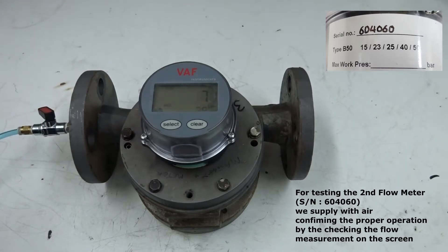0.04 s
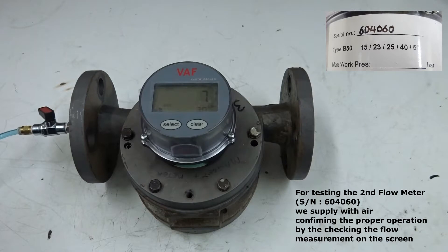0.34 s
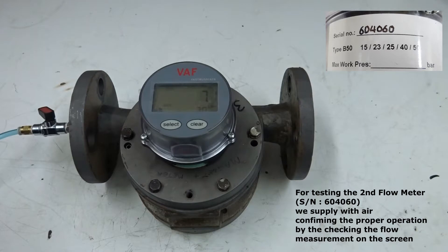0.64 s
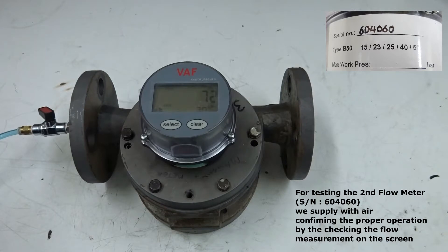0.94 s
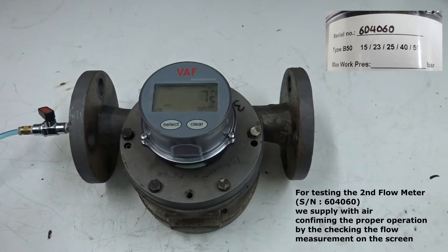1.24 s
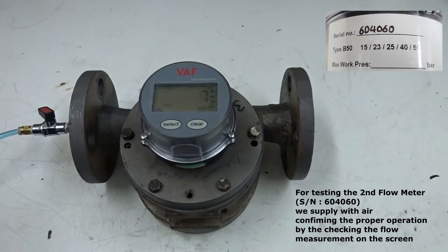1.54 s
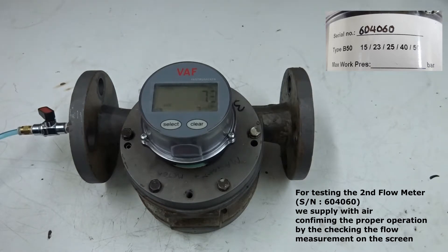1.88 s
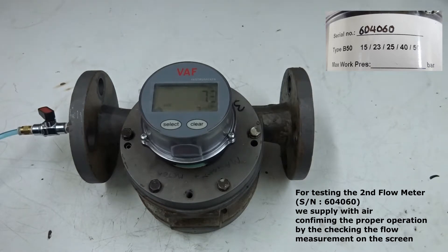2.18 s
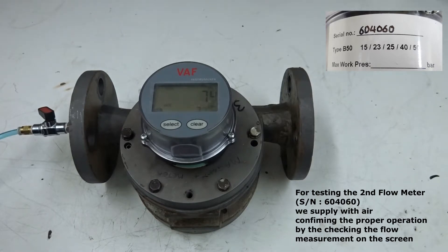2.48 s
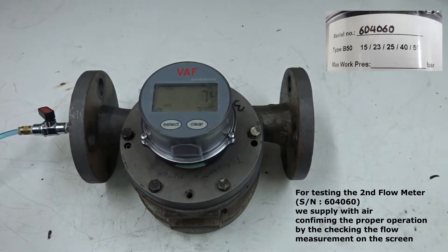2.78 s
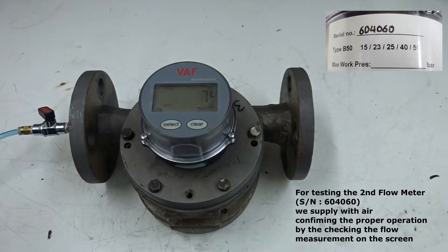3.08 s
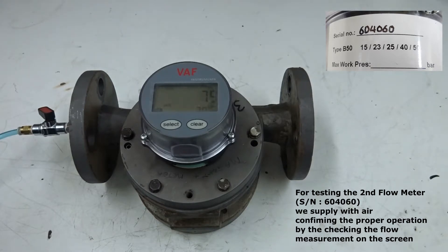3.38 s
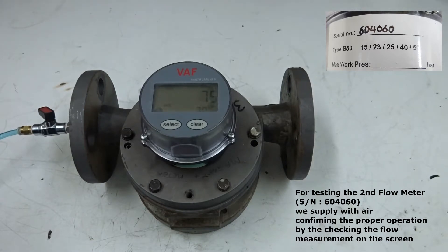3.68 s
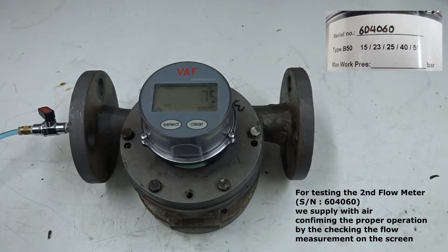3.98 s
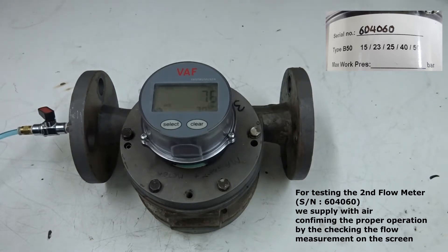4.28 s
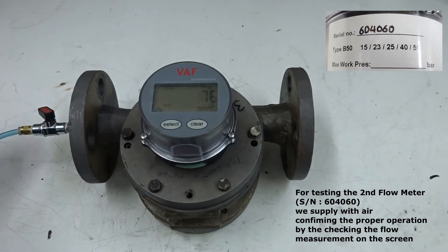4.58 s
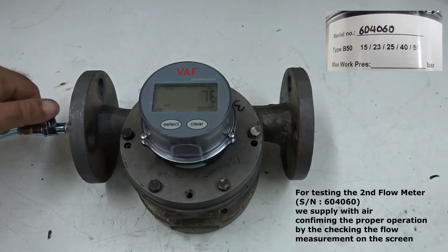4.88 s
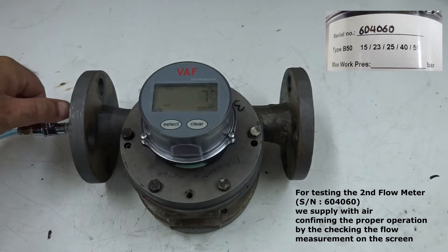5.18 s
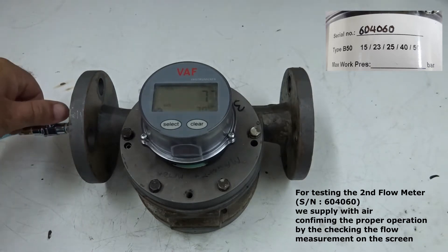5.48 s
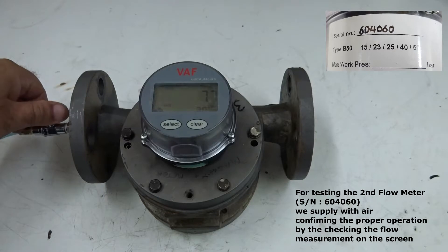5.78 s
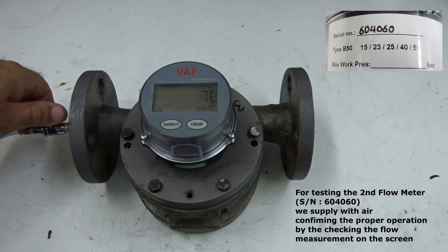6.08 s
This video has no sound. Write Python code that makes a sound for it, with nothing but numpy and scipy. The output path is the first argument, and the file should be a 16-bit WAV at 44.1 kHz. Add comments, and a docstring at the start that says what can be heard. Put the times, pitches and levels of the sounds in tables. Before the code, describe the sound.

Close by on a workshop bench, an air-driven meter whirs loudly and evenly, its fast throbbing hum mixed with fluttering hiss, light ticking and tiny repeating chirps. Near the end the air is shut off: a short, slightly whistling rush passes through the valve, and the hum and hiss die within half a second. A small click from the valve handle follows, over faint ventilation and distant machines.

```python
"""A pulsing hum and hiss with ticks and chirps, then a brief gush of air and a quiet workshop.
Compressed air spins the rotor of a cast-iron flowmeter, four strokes to a turn. Each stroke knocks
the air in the housing into a hum; the hiss swells until the port opens, and the gearing ticks.
A hand closes the ball valve: air tears through the gap, the rotor runs down and the handle clicks."""
import sys
import numpy as np
from scipy import signal
from scipy.fft import rfft, irfft
from scipy.io import wavfile
from scipy.ndimage import uniform_filter1d

SR = 44100
rng = np.random.default_rng(int(sys.argv[2]) if len(sys.argv) > 2 else 0)


def store_pcm(level_fs):
    """Save levels as 16-bit WAV."""
    pcm = np.round(np.clip(level_fs, -1, 1) * 32767).astype(np.int16)
    wavfile.write(sys.argv[1], SR, np.atleast_2d(pcm).T)


N = 279594
TIME = np.arange(N) / SR
HZ = np.fft.rfftfreq(N, 1 / SR)
GRIP_S, CLOSING_S, SHUT_S = 4, 5.56, 5.905  # lever gripped, throttling starts, valve seals

# strokes of one turn: knock/dB, upper-mode boost/dB, thump/dB, hiss/dB
TURN_STROKES = [(-0.77, -0.5, -31, 5), (-1.36, 2.5, -46, 4), (0.5, -2, -28.5, 4), (-0.18, 0, -51, 4)]


def amp(db):
    """Decibels to gain."""
    return 10 ** (np.asarray(db) / 20)


def unit(x):
    """Scale to rms 1."""
    return x / np.sqrt(np.mean(x ** 2) + 1e-20)


def ramp(start_s, end_s):
    """Linear rise from 0 to 1."""
    return np.clip((TIME - start_s) / (end_s - start_s), 0, 1)


def log_interp(points, hz):
    """Interpolate a spectrum table over log frequency."""
    f, value = np.transpose(points)
    return np.interp(np.log(hz + 1), np.log(f + 1), value)


def resonance(hz, width_hz):
    """Gain curve of one resonance, peak 1."""
    return 1 / (1 + (2 * (HZ - hz) / width_hz) ** 2)


def noise(gain):
    """Noise of rms 1, shaped by a gain per frequency."""
    return unit(irfft(rfft(rng.standard_normal(N)) * gain, N))


def band(hz, width_hz):
    """Noise in one resonance."""
    return noise(resonance(hz, width_hz))


def level_band(hz, width_hz):
    """A resonance with wandering pitch and even level."""
    phase = np.angle(signal.hilbert(band(hz, width_hz)))
    return unit(np.cos(phase))


def crossings(count):
    """Samples where a rising count crosses a whole number."""
    return np.flatnonzero(np.diff(np.floor(count)) > 0)


def strike(at, sizes, ring):
    """Set off a ring at each given sample."""
    blows = np.zeros(N)
    blows[at] = sizes
    return signal.oaconvolve(blows, ring)[:N]


def click(decay_s):
    """Envelope of a short contact, peak 1."""
    age = np.arange(SR // 20) / SR / decay_s
    return age * np.exp(1 - age)


def ambience(bed_db=-49):
    """Ventilation and distant machines."""
    ventilation = [(15, -10), (28, -16), (107, 1), (140, -3.5), (193, -2), (274, -5.5), (848, -13),
                   (970, -26), (1050, -11), (1710, -26), (2300, -21), (2770, -27), (3090, -26), (7700, -40),
                   (15500, -43)]  # f/Hz, relative density/dB
    machines = [(217, 40, -52), (933, 14, -61), (2385, 78, -64), (3180, 150, -68)]  # f/Hz, width/Hz, level/dB
    bed = amp(bed_db) * noise(amp(log_interp(ventilation, HZ)))
    return bed + sum(amp(db) * band(hz, width_hz) for hz, width_hz, db in machines)


def room(x):
    """Diffuse tail, each band dying at its own rate."""
    decay_times = [(200, 0.17), (1000, 0.13), (3000, 0.55), (6500, 0.39), (10000, 0.26), (15000, 0.52)]  # f/Hz, t60/s
    hz, t, spectrum = signal.stft(rng.standard_normal(SR), SR, nperseg=256)
    decay = amp(-60 * t / log_interp(decay_times, hz)[:, None])
    tail = signal.istft(spectrum * decay, SR)[1]
    tail[:SR // 200] = 0  # 5 ms pre-delay
    return signal.fftconvolve(x, tail / np.linalg.norm(tail))[:N]


def side_reflections(x, shadow_hz=2000):
    """Reflections reach left and right differently: in phase for bass, in level too for treble."""
    side_gain = [(25, -32), (100, -15), (250, -17.5), (700, -14), (1300, -14.5), (2500, -18), (5000, -14),
                 (9000, -25), (15000, -16)]  # f/Hz, side over mid/dB
    early = rng.standard_normal(SR // 8) * np.linspace(1, 0, SR // 8) ** 2
    paths = rfft(early / np.linalg.norm(early), N)
    paths = paths.real * np.minimum(HZ / shadow_hz, 1) + 1j * paths.imag
    paths *= amp(log_interp(side_gain, HZ))
    response = np.roll(irfft(paths, N), len(early))[:2 * len(early) + 1]
    side = signal.fftconvolve(x, response, "same")
    return np.array([x + side, x - side])


def speed_share(coast_s=5.5, half_speed_after_s=0.22):
    """Share of its running speed the rotor keeps as the air is taken away."""
    return 1 / (1 + (np.maximum(TIME - coast_s, 0) / half_speed_after_s) ** 2)


def airflow(throttled_db=-2, seal_db_per_s=454):
    """Air-noise gain: holds until the valve is nearly closed, dies at the seal."""
    sealed_s = np.maximum(TIME - SHUT_S, 0)
    return amp(throttled_db * ramp(CLOSING_S, SHUT_S) ** 3 - seal_db_per_s * sealed_s)


def chamber(x, strokes, echo, spacing_hz=560):
    """The chamber grows as the rotor turns: its resonance comb slides down one tooth a stroke."""
    analytic, lag = signal.hilbert(x), round(SR / spacing_hz)
    comb = sum(echo ** k * np.roll(analytic, k * lag) * np.exp(-2j * np.pi * k * strokes)
               for k in range(4))
    return unit(comb.real)


def handle(decay_s=0.00083):
    """The valve handle clicks under the fingers."""
    contacts = [(6.238, -58, 5000, 9000), (6.246, -43, 1100, 500)]  # t/s, level/dB, f/Hz, width/Hz
    return sum(strike(round(s * SR), amp(db), click(decay_s)) * band(hz, width_hz)
               for s, db, hz, width_hz in contacts)


def valve_whistle(strokes, fall_hz=600, level_db=-30.5, lead_s=0.035):
    """The closing valve whistles, gliding down in each stroke."""
    phase = strokes % 1
    glide = np.exp(2j * np.pi * np.cumsum(fall_hz * (0.5 - phase)) / SR)
    tone = (signal.hilbert(level_band(hz=2914, width_hz=56)) * glide).real
    pulse = np.sin(np.pi * phase ** 0.8) ** 2
    onset = ramp(CLOSING_S - lead_s, CLOSING_S)
    return amp(level_db) * tone * pulse * onset * speed_share() * airflow()


def valve_gush(strokes, attack_s=0.035, decay_s=0.051, surge_db=-27.5, stream_db=-47):
    """The jet in the half-closed valve swells, then settles to a weak stream."""
    colour = [(50, -25), (200, -1), (700, -3), (1200, -8), (2000, -3.5), (3000, -5), (4300, -4),
              (5500, -12), (15000, -30)]  # f/Hz, relative density/dB
    peak_s = CLOSING_S + attack_s
    surge = amp(surge_db) * np.exp(-np.maximum(TIME - peak_s, 0) / decay_s)
    jet = chamber(noise(amp(log_interp(colour, HZ))), strokes, echo=0.65)
    return jet * (surge + amp(stream_db)) * ramp(CLOSING_S, peak_s) * airflow()


def gear_ticks(strokes, scatter_db=1.2, decay_s=0.00062):
    """Teeth tick at the same places in every turn, unevenly in level."""
    teeth = [(3.94, -22, 3401.2, 830), (3.95, -32.5, 6700, 3800), (1.92, -30, 8650, 2300),
             (.93, -34, 8500, 3200)]  # place/strokes, level/dB, f/Hz, width/Hz
    ticks = np.zeros(N)
    for place, db, hz, width_hz in teeth:
        at = crossings((strokes - place) / len(TURN_STROKES))
        sizes = amp(db + scatter_db * rng.standard_normal(len(at)))
        ticks += strike(at, sizes, click(decay_s)) * level_band(hz, width_hz)
    return ticks * speed_share() * airflow()


def rotor_chirps(strokes, scatter_db=1.4):
    """The rotor chirps at the same places in every turn, unevenly in level."""
    # place/strokes, sigma/strokes, level/dB, change under grip/dB, f/Hz, width/Hz
    spots = [(1.204, 0.2, -33, 2.5, 2315, 72), (2.13, 0.2, -42.5, 0, 2310, 100),
             (0.58, 0.23, -36, 5, 3930, 160), (2.7, 0.31, -44.5, 6.5, 3930, 82),
             (0.84, 0.12, -42, 7, 4560, 41), (1.86, 0.11, -44.5, 8.5, 4560, 94),
             (2.83, 0.036, -37.5, 8, 4560, 33), (0.83, 0.054, -35, 5, 6230, 220),
             (1.437, 0.11, -37, -5.5, 1325, 330)]
    turn, chirps = len(TURN_STROKES), np.zeros(N)
    for place, sigma, db, grip_db, hz, width_hz in spots:
        lap, within = np.divmod(strokes - place + turn / 2, turn)
        lap_db = scatter_db * rng.standard_normal(64)[lap.astype(int)]
        level_db = db + grip_db * ramp(GRIP_S, CLOSING_S) + lap_db
        envelope = np.exp(-0.5 * ((within - turn / 2) / sigma) ** 2)
        chirps += amp(level_db) * envelope * level_band(hz, width_hz)
    return chirps * airflow()


def hiss(strokes, level_db=-31.5, swell_db=7, ripple_db=2.5, roar_hz=1000, treble_hz=8000):
    """The jet grows with pressure in each stroke, drops as the port opens; its roar needs a fast rotor."""
    colour = [(150, -7), (700, 14.5), (1100, -10), (1500, -2), (1950, -11), (2600, -1), (4400, -5.5),
              (5100, -8), (6700, 3.5), (7400, -13), (8300, -5), (11700, -10), (13000, 2), (14300, -13.5),
              (15600, -1)]  # f/Hz, relative density/dB
    outlet_modes = [(1480, 30, 2), (2328, 17, 15), (3700, 97, 0), (3923, 33, 9.5), (4405, 56, 7),
                    (5626, 120, 0), (6270, 110, -4.5), (5950, 56, 1), (6820, 68, -6), (8230, 130, -2.5),
                    (10200, 81, -11), (10840, 390, -0.5), (13100, 104, 1), (13150, 130, -5), (15300, 64, 3)]  # f/Hz, width/Hz, level over jet/dB
    outlet = 1 + sum(amp(db) * resonance(hz, width_hz) for hz, width_hz, db in outlet_modes)
    ripple = uniform_filter1d(rng.standard_normal(len(HZ)), size=260)
    pipe_modes_db = ripple_db * unit(uniform_filter1d(ripple, size=200))
    jet = noise(amp(log_interp(colour, HZ) + pipe_modes_db) * outlet)
    jet = chamber(jet, strokes, echo=0.33)
    roar = signal.sosfiltfilt(signal.butter(4, roar_hz, fs=SR, output="sos"), jet)
    treble = signal.sosfiltfilt(signal.butter(4, treble_hz, "high", fs=SR, output="sos"), jet)
    # duller under the hand, then as the valve throttles
    treble_db = -0.5 - 0.5 * ramp(GRIP_S, CLOSING_S) - 5.5 * ramp(CLOSING_S, SHUT_S) ** 2
    jet = jet + roar * (speed_share() - 1) + treble * (amp(treble_db) - 1)
    stroke_db = np.array(TURN_STROKES)[strokes.astype(int) % len(TURN_STROKES), -1]
    pressure_db = speed_share() ** 2 * (swell_db * (strokes % 1 - 0.5) + stroke_db)
    return jet * amp(level_db + uniform_filter1d(pressure_db, size=90)) * airflow()


def hum(strokes, scatter_db=0.37, upper_hz=500, thump_hz=135, thump_t60_s=0.096):
    """Each stroke lets a slug of air into the housing; strokes alternately thump and ring brighter."""
    air_modes = [(132, -47, 0.16), (220.2, -16.5, 0.026), (290.5, -7.5, 0.09), (356.23, -3, 0.21),
                 (350, -5, 0.11), (403, -22, 0.27), (440.6, -26.6, 0.49), (590, -10.5, 0.027),
                 (729.8, -17, 0.069), (765.7, -26.5, 0.2)]  # housing and pipe: f/Hz, level/dB, t60/s
    grip_upper_db, slow_upper_db = 1.7, 5.5
    dip_s, dip_width_s, dip_db = 5.635, 0.02, -16  # brief dip as the air is throttled
    damped_from_s, damping_t60_s = 5.535, 0.2  # extra damping once the rotor slows
    at, t = crossings(strokes), np.arange(SR // 2) / SR
    in_turn = np.round(strokes[at]).astype(int) % len(TURN_STROKES)
    knock_db, upper_db, thump_db, _ = np.array(TURN_STROKES)[in_turn].T
    brighten_db = grip_upper_db * ramp(GRIP_S, CLOSING_S) + slow_upper_db * (1 - speed_share()) ** 2
    opening = 1 - ramp(CLOSING_S, SHUT_S)
    drive = opening ** 2.1 * amp(dip_db * np.exp(-((TIME - dip_s) / dip_width_s) ** 2))
    force = drive[at] * amp(scatter_db * rng.standard_normal(len(at)))

    modes = np.array([(-1) ** k * amp(db - 60 * t / t60_s) * np.sin(2 * np.pi * hz * t)
                      for k, (hz, db, t60_s) in enumerate(air_modes)])
    upper = np.array(air_modes)[:, 0] > upper_hz
    thump = np.sin(2 * np.pi * thump_hz * t) * amp(-60 * t / thump_t60_s)
    rings = [(knock_db, modes[~upper].sum(0)),
             (knock_db + upper_db + brighten_db[at], modes[upper].sum(0)),
             (thump_db, thump)]
    slowing = TIME[at] > damped_from_s
    sound = np.zeros(N)
    for db, ring in rings:
        sound += strike(at, force * amp(db) * ~slowing, ring)
        sound += strike(at, force * amp(db) * slowing, ring * amp(-60 * t / damping_t60_s))
    sound = signal.lfilter(*signal.butter(1, 25, "high", fs=SR), sound)
    turbulence = 1 + 0.1 * band(hz=0, width_hz=90)
    return sound * turbulence


def scene(start_strokes=2.95, hum_room_db=-27, air_room_db=-9):
    """The rotor's position, counted in strokes, drives hum, hiss and gearing."""
    running_speed = [(0, 28.01), (1.3, 28.235), (3.3, 28.1), (5.5, 27.98)]  # t/s, rate/(strokes/s)
    strokes_per_s = np.interp(TIME, *np.transpose(running_speed)) * speed_share()
    strokes = start_strokes + np.cumsum(strokes_per_s) / SR
    housing = hum(strokes)
    air = hiss(strokes) + gear_ticks(strokes) + rotor_chirps(strokes)
    air += valve_gush(strokes) + valve_whistle(strokes) + handle()
    reverb = room(amp(hum_room_db) * housing + amp(air_room_db) * air)
    return side_reflections(housing + air + reverb + ambience())


def record(dry, cutoff_hz=15780):
    """Steep low-pass on both channels."""
    lowpass = signal.firwin(1023, cutoff_hz, window=("kaiser", 9), fs=SR)
    return signal.oaconvolve(dry, lowpass[None], "same")


dry = scene()
out = record(dry)
store_pcm(out)
```